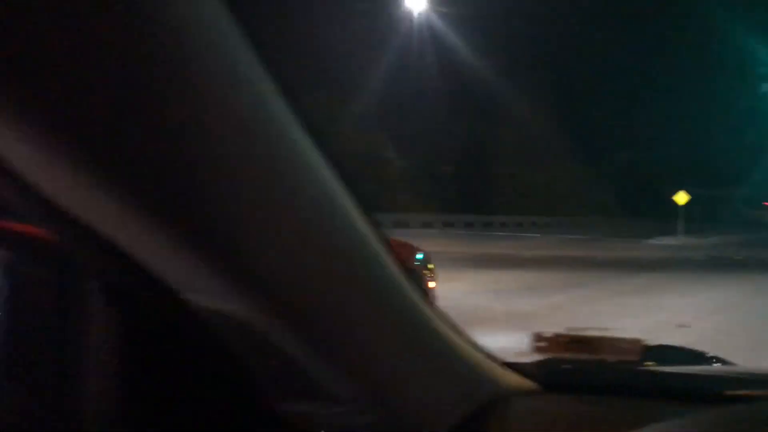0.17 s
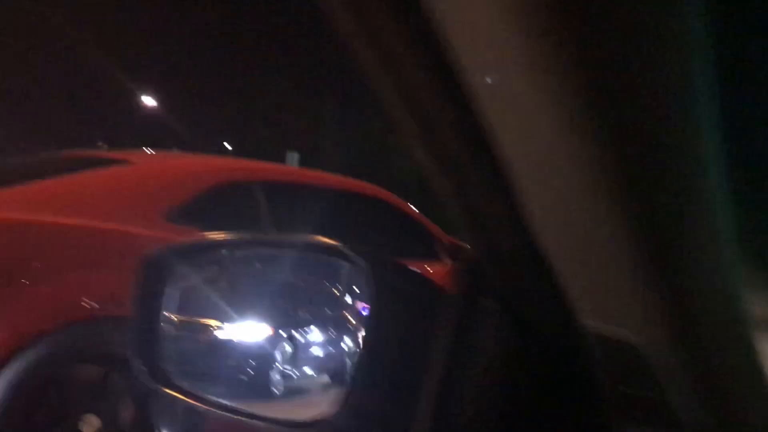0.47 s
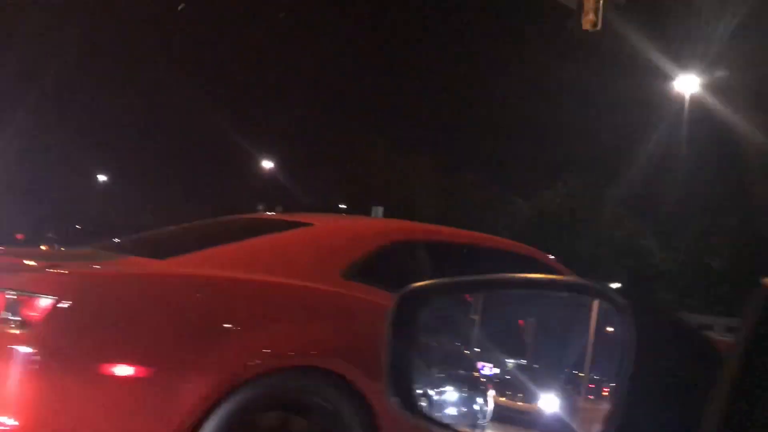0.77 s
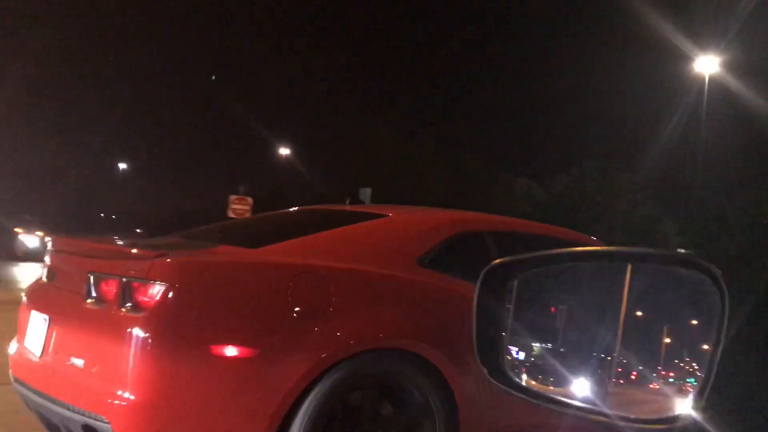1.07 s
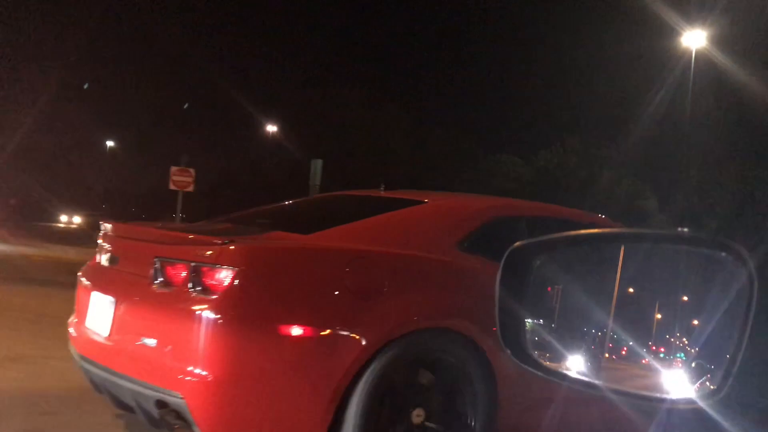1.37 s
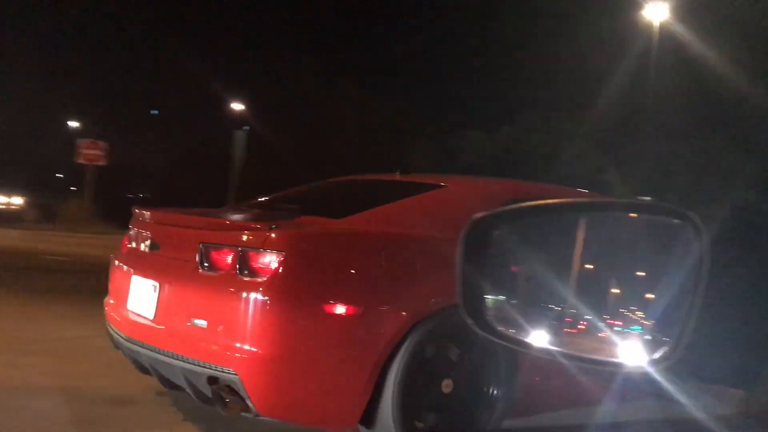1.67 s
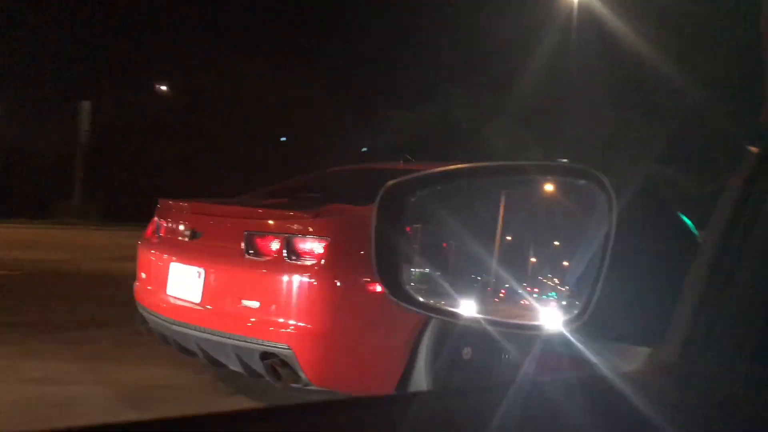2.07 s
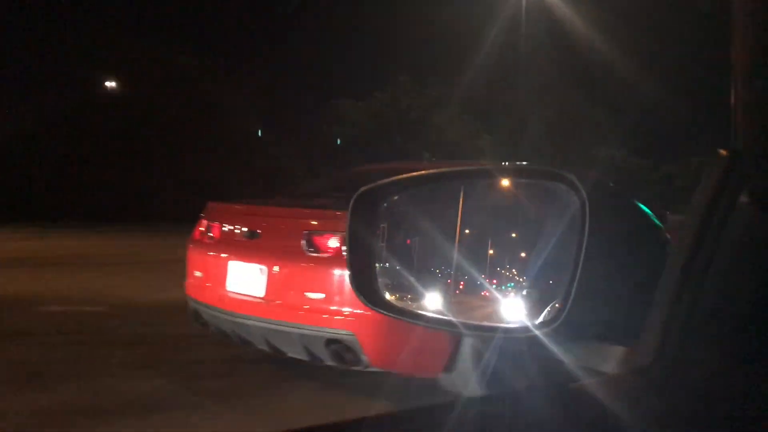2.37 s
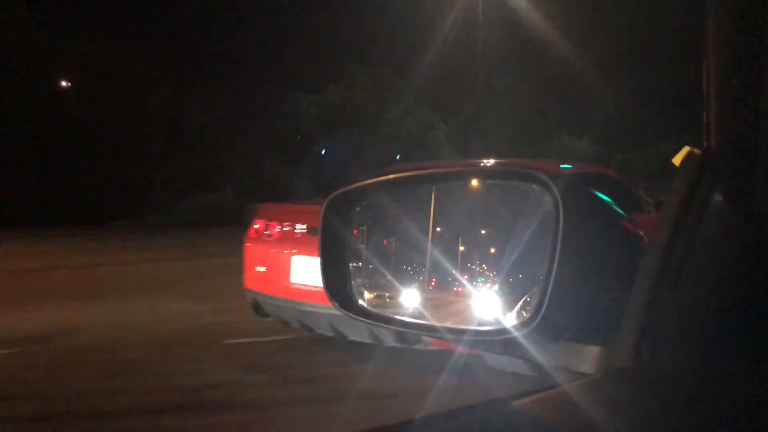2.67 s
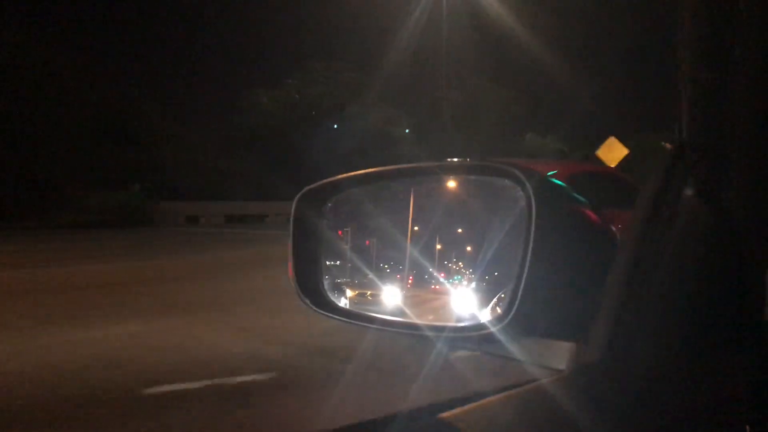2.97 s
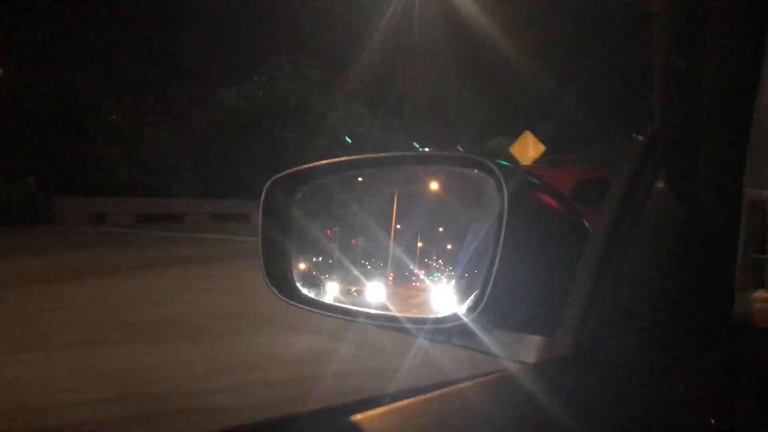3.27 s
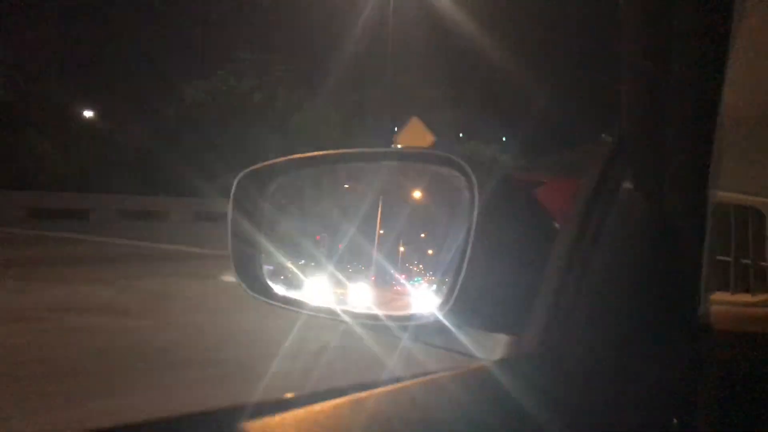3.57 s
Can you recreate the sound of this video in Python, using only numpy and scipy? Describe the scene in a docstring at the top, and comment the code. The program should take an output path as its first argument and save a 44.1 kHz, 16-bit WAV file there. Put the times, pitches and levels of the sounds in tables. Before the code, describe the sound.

A loud sports car overtakes, its exhaust rasping and crackling over tyre hiss and road rumble.

```python
"""A throbbing V8 and a rush of tyres come up alongside: a sports car overtakes at night and pulls away.
The microphone rides at the open window of a moving car. The V8's uneven cylinders throb, bark and rasp
through the exhaust as the revs climb; the driver lifts, the pipes burble, and the engine catches again
with a bang in the next gear. Tyres hiss past over a low road rumble."""
import sys
import numpy as np
from scipy import signal
from scipy.fft import rfft, irfft, next_fast_len
from scipy.io import wavfile
from scipy.ndimage import map_coordinates

SR = 44100
rng = np.random.default_rng(int(sys.argv[2]) if len(sys.argv) > 2 else 0)


def wrap_up_sound(samples):
    """Save the sound to the file named by the first command line argument, as 16-bit audio."""
    columns = np.atleast_2d(samples).T
    # keep every value between -1 and 1, then stretch to whole-number steps
    tamed = np.clip(columns, -1, 1)
    steps = np.round(tamed * 32767).astype(np.int16)
    wavfile.write(sys.argv[1], SR, steps)


N = 164493
TIME = np.arange(N) / SR

# engine speed (time [s], firing rate [Hz])
ENGINE_SPEED = [(0, 85), (.2, 100), (.4, 107), (.55, 117), (.66, 126), (.85, 127.6), (1.08, 144.1),
                (1.3, 152), (1.49, 165), (1.63, 162), (1.77, 175.3), (1.91, 186.5), (2.24, 201.4),
                (2.42, 215.8), (2.7, 224), (2.82, 232), (2.95, 230), (3.15, 221)]
# the eight cylinders in firing order (strength [dB], lateness at the tailpipe [ms])
CYLINDERS = [(2.5, -0.048), (-7, 0.29), (1.5, 0.099), (1.5, 0.59), (5, 0.34), (-3.5, -0.13), (-3.5, 0.49),
             (7.5, -0.2)]


def firings(phase, jitter_ms=.015, scatter_db=1.0):
    """Each cylinder in turn fires an uneven exhaust pulse: its time [s], lateness [s] and size."""
    count = np.arange(1, int(phase[-1]))
    strength_db, late_ms = np.array(CYLINDERS)[count % len(CYLINDERS)].T
    late = (late_ms + jitter_ms * rng.standard_normal(len(count))) / 1000
    sizes = amp(strength_db + scatter_db * rng.standard_normal(len(count)))
    return np.interp(count, phase, TIME), late, sizes


def roar(phase, times, sizes):
    """Growl, pulses and their turbulence bark and rasp in the pipes; the strongest pulses crackle."""
    # each register at the microphone (time [s], level [dB])
    bark_level = [(0, -37), (.3, -30), (.6, -21.5), (1.0, -20.5), (1.05, -32), (1.32, -24.5), (1.45, -25.5),
                  (1.8, -21.5), (2.07, -17), (2.45, -24.5), (2.7, -23), (2.95, -31), (3.15, -47)]
    rasp_level = [(0, -38.5), (.5, -42), (.8, -32), (1, -34.5), (1.12, -42.5), (1.35, -35.5), (1.78, -32),
                  (2.07, -20.5), (2.35, -32.5), (2.62, -28), (2.95, -46), (3.2, -89)]
    crackle_level = [(0, -46.5), (.9, -52), (1.1, -58), (1.75, -49.5), (2.0, -36), (2.13, -36.5),
                     (2.28, -46.5), (2.5, -42.5), (2.67, -47), (2.95, -68), (3.2, -68)]
    # the crackle's spectrum (frequency [Hz], gain [dB])
    crackle_colour = [(1500, -23), (3300, -2), (4300, -3.5), (5200, -7.5), (6500, -12), (9000, -21),
                      (15000, -37)]
    # inverted tailpipe echo; as it shortens, the rasp's resonances climb (time [s], delay [ms])
    pipe_echo = [(0, 0.82), (1.098, 0.78), (1.5, 0.83), (1.799, 0.74), (2.05, 0.71), (2.25, 0.663),
                 (2.45, .63), (2.9, 0.56)]
    train = pulses(times, sizes)
    gas = unit(train) + amp(2) * growl(phase)
    turbulence = puffs(train, decay_ms=2.5)
    bark = band(tailpipes(gas + amp(-11) * turbulence), lo_hz=370, hi_hz=1800)
    rasp = tailpipes(gas + amp(-2) * turbulence)
    rasp = band(echoed(rasp, pipe_echo, gain=-.42), lo_hz=1700, hi_hz=5500)
    spikes = pulses(times, sizes * amp(3 * rng.standard_normal(len(times))))
    crackle = coloured(puffs(spikes, decay_ms=1.2), crackle_colour)
    crackle = unit(echoed(crackle, pipe_echo, gain=-.21))
    return fader(bark_level) * bark + fader(rasp_level) * rasp + fader(crackle_level) * crackle


def growl(phase, size=1024, swell=.7):
    """Waves criss-crossing the pipes repeat every engine cycle, drift, and swell with each firing."""
    patterns = irfft(np.exp(2j * np.pi * rng.random((2, size // 2 + 1))))
    position = phase / len(CYLINDERS) * size % size
    first, second = (map_coordinates(p, [position], mode='grid-wrap') for p in patterns)
    drift = 0.64 * wobble(per_s=2.5)
    waves = np.cos(drift) * first + np.sin(drift) * second
    return unit(waves * (1 + swell * np.cos(2 * np.pi * phase)))


def tailpipes(x, beside_s=0.93, behind_s=2.145, crossfade_s=0.17):
    """As the car passes, the microphone hears its pipes from ahead, then beside, then behind."""
    # the pipes' tone from each side (frequency [Hz], gain [dB])
    ahead = [(380, 4), (455, -6), (540, 5), (660, 6), (760, -1), (840, 6.5), (980, -4), (1100, 2),
             (1500, -7), (1800, -12), (2100, -6), (2450, -5), (3100, -8), (4500, -34)]
    beside = [(400, 0), (480, 1), (590, 8.5), (700, 8), (780, 2), (880, 3), (1000, -1), (1300, 1),
              (1550, -1), (1780, -7), (2050, 0), (2500, -11), (3300, -12), (4500, -24)]
    behind = [(400, 2), (550, 3), (720, 1), (820, 4), (930, 3.5), (1200, -2), (1450, -6), (1750, -14),
              (2300, -7), (3100, -9), (4500, -27)]
    reached, passed = (np.clip((TIME - s) / crossfade_s + .5, 0, 1) for s in (beside_s, behind_s))
    return ((1 - reached) * coloured(x, ahead)
            + (reached - passed) * coloured(x, beside)
            + passed * coloured(x, behind))


def drone(phase):
    """The firing note, its octave, and the cylinder banks' boom sweeping through the pipe resonances."""
    # each part at the microphone (time [s], level [dB])
    note_level = [(0, -13.5), (.2, -22.5), (.4, -20.5), (.65, -13), (.82, -19.5), (.95, -9), (1.08, -16),
                  (1.3, -20.5), (1.58, -30), (2.03, -19.5), (2.37, -30.5), (2.55, -38), (3.1, -54)]
    octave_level = [(0, -25), (.3, -28), (.75, -22.5), (.97, -15.5), (1.1, -28), (1.3, -19.5), (1.83, -29),
                    (2.07, -13), (2.35, -21), (2.64, -24.5), (2.9, -26), (3.2, -42)]
    boom_level = [(0, -41.5), (.5, -37), (.93, -36), (1.1, -45), (1.4, -37.5), (1.75, -36.5), (2.07, -35),
                  (2.4, -38), (2.78, -33.5), (3.1, -38), (3.3, -53)]
    # partials of the boom (frequency [multiples of the engine cycle rate], level [dB])
    bank_orders = [(3, -3.5), (4, -7), (5, 5.5), (6, 3.5), (7, -5.5), (9, -4.5), (10, 3), (11, 3.5),
                   (12, 0), (13, 1.5), (14, 6.5), (15, -3), (17, -2.2), (18, -4.5), (19, 5), (20, -0.5)]
    # pipe resonances (frequency [Hz], gain [dB])
    bank_colour = [(45, -4), (65, -8), (82, 7), (100, -4.5), (125, 3), (142, 12.5), (165, -6), (190, 8),
                   (225, -1), (250, 2.5), (285, -2), (310, 4.5), (350, -4), (395, 3.5), (440, -5),
                   (480, -5), (540, 3), (600, 1)]

    def partial(multiple, waver_db):
        tone = np.sqrt(2) * np.sin(2 * np.pi * (multiple * phase + rng.random()))
        return tone * amp(waver_db * wobble(per_s=16))

    firing_hz = curve(ENGINE_SPEED)
    boom = np.zeros(N)
    for order, db in bank_orders:
        multiple = round(order) / len(CYLINDERS)
        boom += amp(db + along(bank_colour, multiple * firing_hz)) * partial(multiple, waver_db=1.5)
    note = fader(note_level) * partial(0.99, waver_db=0.1)
    octave = fader(octave_level) * partial(2, waver_db=1.0)
    return note + octave + fader(boom_level) * boom


def throb(times):
    """Chance differences between firings rumble underneath, most at low revs."""
    # throb at the microphone (time [s], level [dB])
    level = [(0, -24), (.3, -16), (.51, -15), (.6, -23.5), (.9, -25), (1.15, -30), (1.5, -29.5),
             (2.0, -26.5), (2.4, -34.5), (3.2, -42.5)]
    # its spectrum (frequency [Hz], gain [dB])
    colour = [(30, -42), (55, -18), (76, -14), (100, -6), (130, -2), (180, 0.5), (250, -9), (370, -10.5),
              (450, -26.5), (1200, -58)]
    train = pulses(times, rng.uniform(-0.99, 1, len(times)))
    return fader(level) * unit(cabin(coloured(train, colour)))


def burble(times):
    """With the throttle shut, ragged firings boom and sputter in the pipes."""
    # burble from up the road (time [s], level [dB])
    level = [(2.7, -33.5), (3.0, -29), (3.2, -21.5), (3.45, -23), (3.58, -21.5), (3.73, -24)]
    # low pipe resonances (frequency [Hz], width [Hz], gain [dB])
    pipe_modes = [(84, 6.8, -4.5), (135.8, 12, -1.5), (177.6, 15.4, -6)]
    # the sputter's spectrum (frequency [Hz], gain [dB])
    sputter_colour = [(200, -39), (285, -26), (365, 1), (520, 2.5), (680, -4.5), (790, -15), (930, -6),
                      (1300, -26), (2200, -23.5), (3800, -31.5), (5000, -42), (7000, -43), (15000, -70)]

    def pipe_gain(hz):
        peaks = [amp(db) * abs(hz * width / (centre ** 2 - hz ** 2 + 1j * hz * width)) ** 2
                 for centre, width, db in pipe_modes]
        return np.linalg.norm(peaks, axis=0)

    ragged_db = 5.3 * np.clip(rng.standard_normal(len(times)), -2, 1.4)
    train = pulses(times, amp(ragged_db))
    sputter = coloured(puffs(train, decay_ms=6), sputter_colour)
    return fader(level) * (unit(shaped(train, pipe_gain)) + amp(-3) * sputter)


def thumps(pitch_hz=129, rise_s=0.0099):
    """Dull low puffs of unburnt fuel during the lift."""
    # thumps in the pipes (time [s], level [dB])
    events = [(3.172, -11), (3.272, -10.5), (3.38, -11), (3.452, -12), (3.549, -7)]
    starts, levels_db = np.transpose(events)
    age = since(starts[:, None])
    rise = age / rise_s
    envelope = rise * np.exp(1 - rise - (rise / 3) ** 2)
    return -amp(levels_db) @ (envelope * np.sin(2 * np.pi * pitch_hz * age))


def gear_catch(start_s=3.602, firing_hz=174, fall_db_per_s=105):
    """The engine catches hard at lower revs in the next gear: a burst of firings that dies quickly."""
    # the burst's spectrum (frequency [Hz], gain [dB])
    colour = [(70, -14), (170, 5), (350, -2), (530, 3), (720, -4), (1000, -9), (1400, -33), (3000, -31),
              (5000, -66), (15000, -68)]
    age = since(start_s)
    times = np.arange(start_s % (1 / firing_hz), N / SR, 1 / firing_hz)
    train = pulses(times, amp(1.1 * rng.standard_normal(len(times))))
    envelope = amp(-10 - fall_db_per_s * age) * (1 - np.exp(-age / 0.0007))
    note = coloured(train - train.mean(), colour)
    turbulence = amp(-2) * np.exp(-age / .1) * coloured(puffs(train, decay_ms=5.7), colour)
    return envelope * (note + turbulence)


def afterfire(decay_s=0.0031):
    """Afterfire cracks in the pipes at full throttle and at the gear change."""
    # cracks (time [s], level [dB])
    cracks = [(2.089, -35), (2.113, -19.5), (2.149, -22), (2.17, -19), (2.51, -21), (2.655, -22),
              (3.604, -24), (3.626, -20), (3.637, -25)]
    # their spectrum (frequency [Hz], gain [dB])
    colour = [(500, 4.5), (3500, 2), (6000, -22), (15000, -50)]
    envelope = sum(amp(db) * (TIME > s) * np.exp(-since(s) / decay_s) for s, db in cracks)
    return envelope * noise(colour)


def tyres():
    """The treads roar and hiss as the car draws level with the window and goes by."""
    # tyres and air at the microphone (time [s], level [dB])
    tread_level = [(0, -29), (.2, -25.5), (.42, -26.5), (.58, -22.5), (.75, -36.5), (1.0, -34.5),
                   (1.4, -35), (2.2, -77)]
    hiss_level = [(0, -42), (.25, -39.5), (.55, -33), (.88, -34), (1.05, -43), (1.5, -41.5), (2.08, -38),
                  (2.25, -41.5), (2.68, -41.5), (2.85, -47), (3.3, -51.5), (3.73, -52)]
    # their spectra (frequency [Hz], gain [dB])
    tread_colour = [(300, -39), (700, -15), (1100, 5.5), (1500, 3.5), (2000, -5), (2600, -19.5),
                    (3300, -15.5), (5000, -30.5)]
    hiss_colour = [(400, 0.5), (3000, 11), (5000, 0.5), (7500, -2.5), (8700, -0.5), (9900, -2.5),
                   (10400, -8), (11300, -3), (15500, -5.5)]
    # bounce off the road, latest when the car is close (time [s], extra delay [ms])
    road_echo = [(0, 0.41), (.35, 0.53), (.6, 0.81), (.85, 0.93), (1.1, 0.88), (1.6, 1), (2.05, 0.9105),
                 (2.45, 0.95), (2.9, 0.61)]
    treads = fader(tread_level) * unit(echoed(noise(tread_colour), road_echo, gain=0.47))
    flutter_db = 1.15 * wobble(per_s=24.75)
    return treads + amp(curve(hiss_level) + flutter_db) * noise(hiss_colour)


def road_rumble(level_db=-33):
    """The road rumbles, wavering a little, under the car that carries the microphone."""
    # the rumble's spectrum (frequency [Hz], gain [dB])
    colour = [(20, -37), (45, -9), (80, -1.5), (130, -1.5), (250, -14.5), (900, -15), (2500, -30),
              (8000, -66)]
    return amp(level_db + 1.9 * wobble(per_s=6.2)) * noise(colour)


def cabin(x, wet_db=-8):
    """Short reflections inside the car, close around the microphone."""
    # cabin reverberation (frequency [Hz], time to fall 60 dB [s])
    decay = [(100, 0.12), (1000, 0.11), (8000, 0.027)]
    hz, age, spectrum = signal.stft(rng.standard_normal(SR // 4), SR, nperseg=256)
    tail = signal.istft(spectrum * amp(-60 * age / along(decay, hz)[:, None]), SR, nperseg=256)[1]
    reflections = signal.fftconvolve(x, tail / np.linalg.norm(tail))[:N]
    return (x + amp(wet_db) * reflections) / np.hypot(1, amp(wet_db))


def echoed(x, delay_rows, gain):
    """A short echo combs the sound; the teeth glide as the car moves."""
    delayed = np.arange(N) - curve(delay_rows) * SR / 1000
    return x + gain * map_coordinates(x, [delayed], order=3)


def pulses(times, sizes):
    """Impulses, each shared between its two nearest samples."""
    at = np.clip(times * SR, 0, N)
    i = at.astype(int)
    before = np.bincount(i, sizes * (1 - at + i), N + 2)
    after = np.bincount(i + 1, sizes * (at - i), N + 2)
    return (before + after)[:N]


def puffs(train, decay_ms):
    """A burst of turbulence after each impulse, at rms 1."""
    envelope = signal.lfilter([1], [1, -np.exp(-1000 / (decay_ms * SR))], train)
    return unit(envelope * rng.standard_normal(N))


def shaped(x, gain):
    """Minimum-phase filter with the given gain as a function of Hz."""
    size = 2 * next_fast_len(N // 2 + SR // 8)
    cepstrum = irfft(np.log(np.maximum(gain(np.fft.rfftfreq(size, 1 / SR)), 1e-6)), size)
    cepstrum[1:size // 2] *= 2
    cepstrum[size // 2 + 1:] = 0
    return irfft(rfft(x, size) * np.exp(rfft(cepstrum)), size)[:N]


def coloured(x, colour):
    """x through a body of (frequency [Hz], gain [dB]) rows, at rms 1."""
    return unit(shaped(x, lambda hz: amp(along(colour, hz))))


def noise(colour):
    """Coloured noise at rms 1."""
    return coloured(rng.standard_normal(N), colour)


def band(x, lo_hz, hi_hz):
    """One register of x, at rms 1."""
    return unit(signal.sosfiltfilt(signal.butter(4, [lo_hz, hi_hz], 'band', fs=SR, output='sos'), x))


def wobble(per_s):
    """A smooth random curve with per_s knots a second."""
    return map_coordinates(rng.standard_normal(int(N * per_s / SR) + 4), [TIME * per_s])


def along(rows, hz):
    """(frequency [Hz], value) rows read at hz on a log axis."""
    frequencies, values = np.transpose(rows)
    return np.interp(np.log(hz + 1), np.log(frequencies + 1), values)


def curve(rows):
    """(time [s], value) rows as one value per sample."""
    return np.interp(TIME, *np.transpose(rows))


def fader(rows):
    """(time [s], level [dB]) rows as one gain per sample."""
    return amp(curve(rows))


def since(start_s):
    """Seconds since start_s, zero before it."""
    return np.maximum(TIME - start_s, 0)


def amp(db):
    """Decibels to gain."""
    return 10 ** (np.asarray(db) / 20)


def unit(x):
    """Scale to rms 1."""
    return x / np.sqrt(np.mean(x ** 2) + 1e-20)


def scene():
    """Exhaust, tyres and road meet at one microphone in the open window."""
    phase = np.cumsum(curve(ENGINE_SPEED)) / SR  # advances by one per firing
    times, late, sizes = firings(phase)
    pulling = drone(phase) + throb(times) + cabin(roar(phase, times + late, sizes))
    exhaust = pulling + burble(times) + thumps() + gear_catch() + afterfire()
    return (exhaust + tyres() + road_rumble())[None]


def record(dry, top_hz=15800):
    """Peaks round off near full scale; nothing is kept above top_hz."""
    rounded = dry / (1 + np.abs(dry) ** 8) ** (1 / 8)
    size = next_fast_len(N + SR // 2)
    passband = np.fft.rfftfreq(size, 1 / SR) < top_hz
    return irfft(rfft(rounded, size) * passband, size)[..., :N]


dry = scene()
out = record(dry)
wrap_up_sound(out)
```